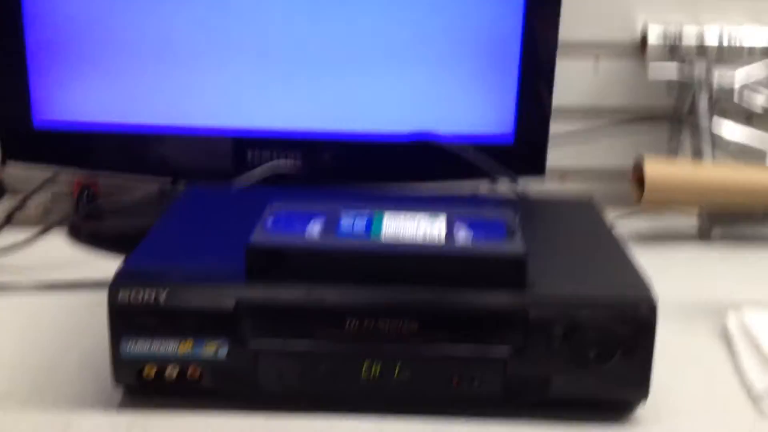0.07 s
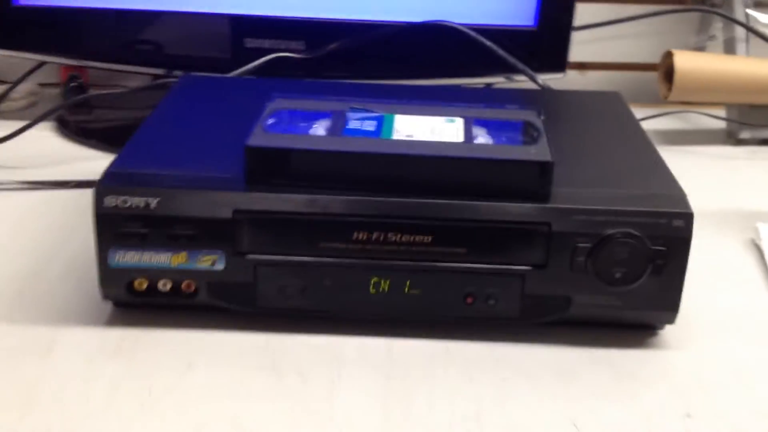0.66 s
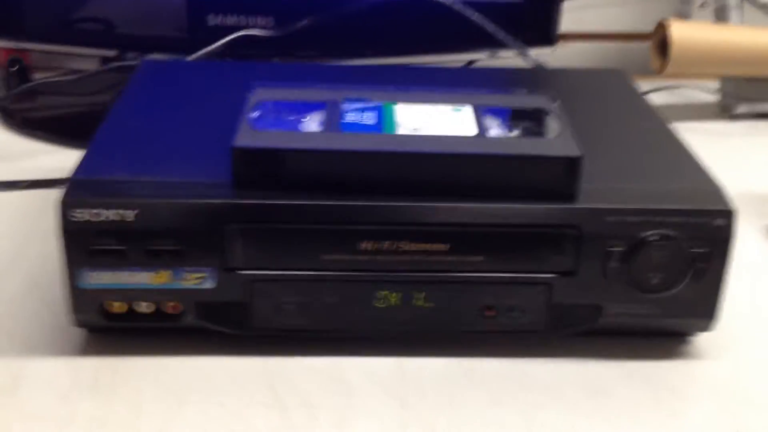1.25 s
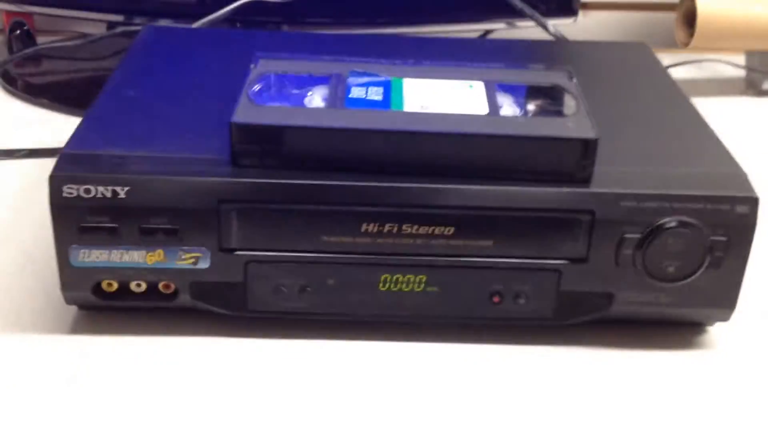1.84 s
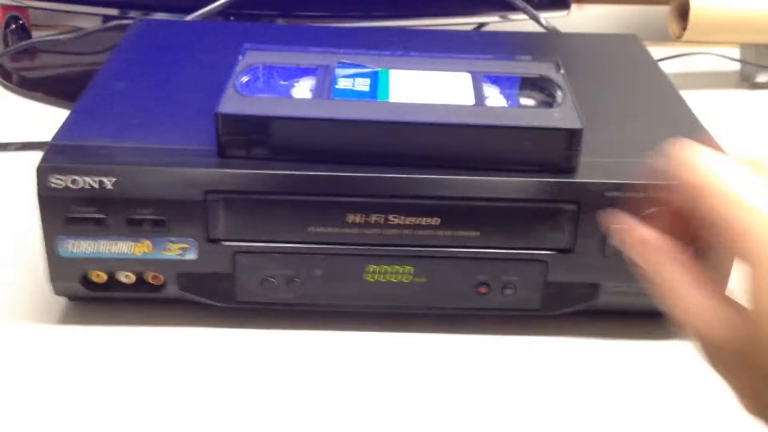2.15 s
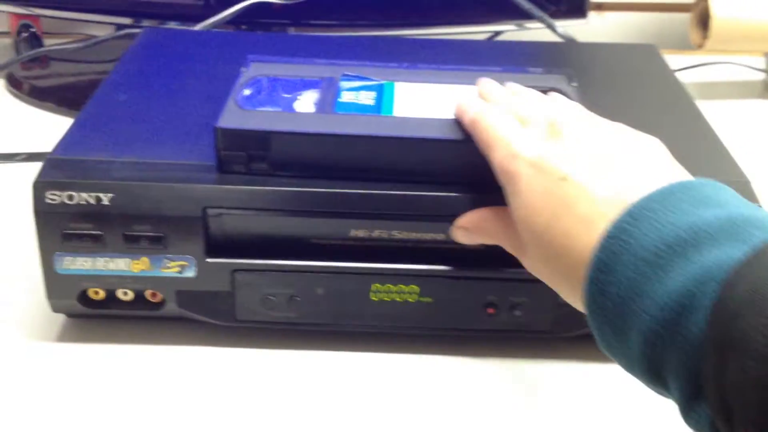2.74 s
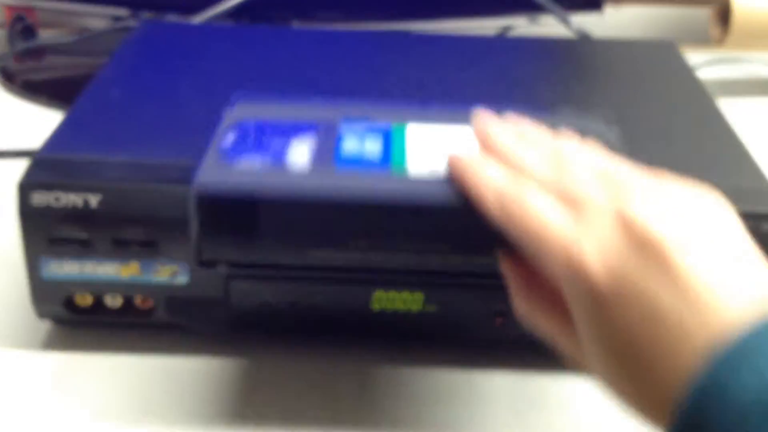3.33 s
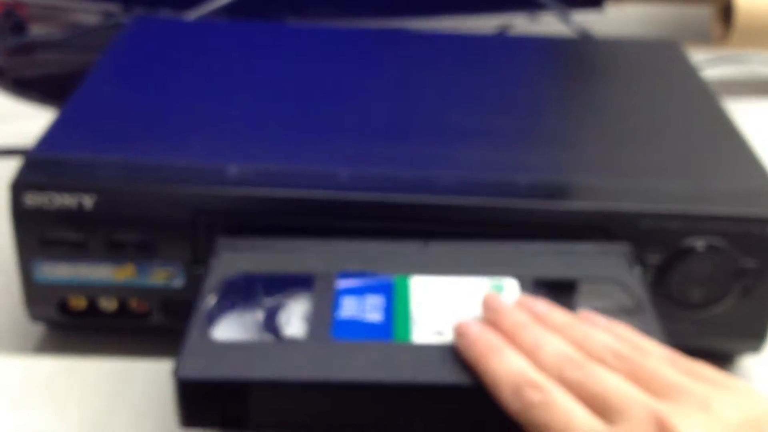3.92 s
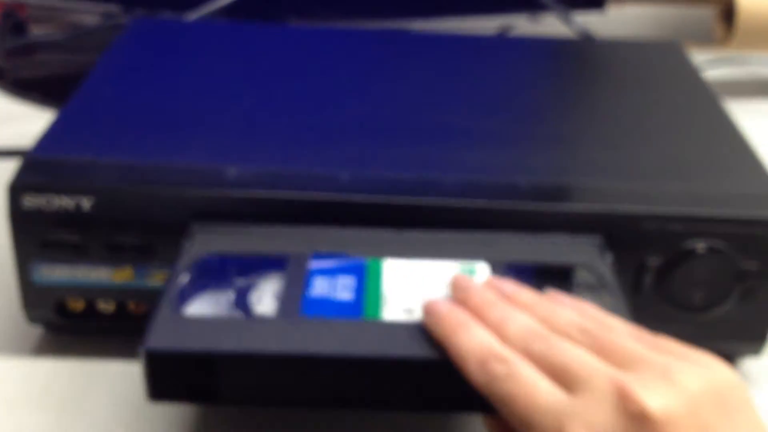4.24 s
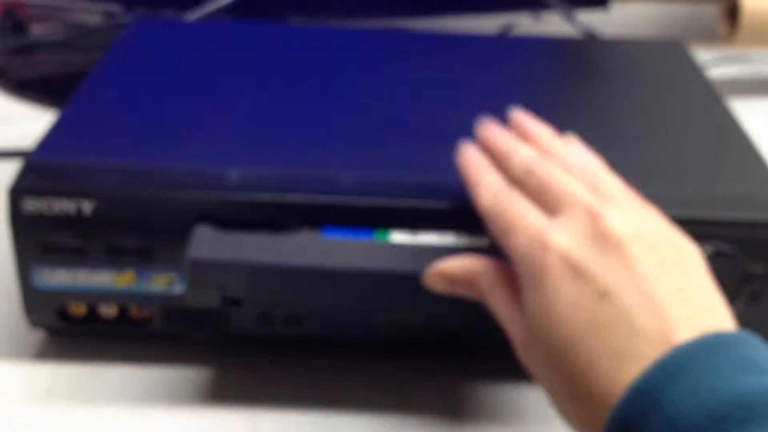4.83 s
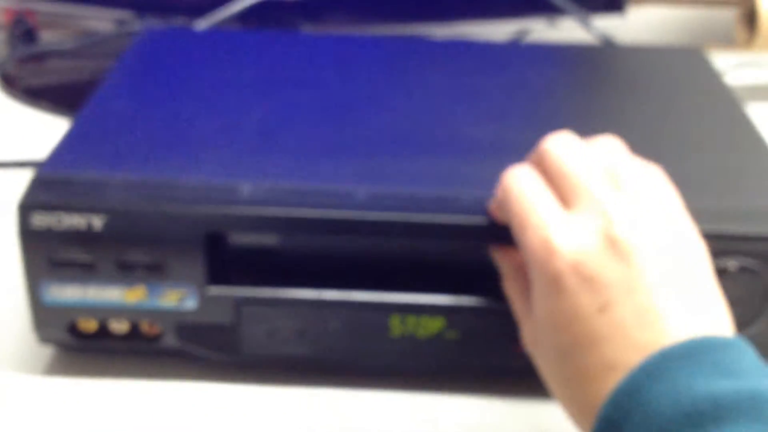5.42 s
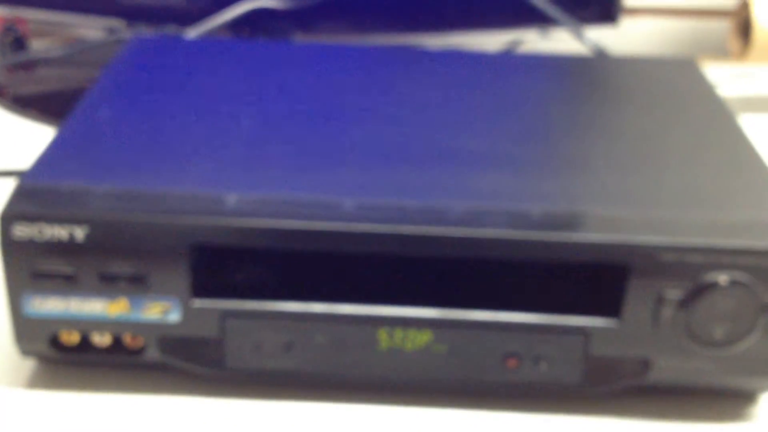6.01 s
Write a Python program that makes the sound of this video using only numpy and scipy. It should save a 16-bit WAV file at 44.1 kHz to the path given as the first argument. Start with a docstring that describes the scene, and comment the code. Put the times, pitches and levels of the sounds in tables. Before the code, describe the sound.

In a quiet room, plastic slides and knocks as a videotape is pushed into a recorder, whose motor whirs and clatters.

```python
"""A video cassette is gripped, dragged off the lid of a tape deck and pushed through the flap into its slot.
Plastic scrapes in stick-slip bursts; the loader draws the cassette in and lowers it with clicks and
clacks, then the motor whirs, gear teeth tick and the mechanism rasps. Every contact booms in the
sheet-metal case. Before it all, clothes rustle and one dull tap sounds in the small, quiet room."""
import sys
import numpy as np
from scipy import signal
from scipy.fft import rfft, irfft, next_fast_len
from scipy.io import wavfile
from scipy.ndimage import map_coordinates

SR = 44100
rng = np.random.default_rng(int(sys.argv[2]) if len(sys.argv) > 2 else 0)


def file_out(sig):
    """Save sig as 16-bit WAV at sys.argv[1]."""
    # one column per channel
    cols = np.atleast_2d(sig).T
    # limit, then scale
    lim = np.clip(cols, -1, 1)
    pcm = np.round(lim * 32767).astype(np.int16)
    wavfile.write(sys.argv[1], SR, pcm)


N = 267246


def amp(db):
    """Decibels to gain."""
    return 10 ** (np.asarray(db) / 20)


def unit(x):
    """Scale to rms 1."""
    return x / np.sqrt(np.mean(x ** 2) + 1e-20)


def burst(x):
    """Scale a hit to the energy of 10 ms at rms 1."""
    return x / np.sqrt(np.sum(x ** 2) / (SR / 100) + 1e-20)


def along(points, hz):
    """Read a (frequency, value) curve on a log frequency axis."""
    freqs, values = np.transpose(points)
    return np.interp(np.log(hz + 1), np.log(freqs + 1), values)


def wobble(rate, size=N):
    """Smooth random modulation, rate knots a second."""
    knots = rng.standard_normal(int(size * rate / SR) + 4)
    return map_coordinates(knots, [np.arange(size) * rate / SR])


def swell(middle, length):
    """A bell-shaped fade in and out, timed in seconds."""
    return np.cos(np.pi * np.clip((np.arange(N) / SR - middle) / length, -.5, .5)) ** 2


def filtered(x, response):
    """Apply a frequency response."""
    size = next_fast_len(len(x) + 4096)
    return irfft(rfft(x, size) * response(np.fft.rfftfreq(size, 1 / SR)), size)[:len(x)]


def coloured(x, curve):
    """Shape x with a (frequency, gain) EQ curve."""
    return filtered(x, lambda hz: amp(along(curve, hz)))


def resonate(x, modes):
    """Ring x through parallel (frequency, width, gain) resonators of alternating polarity."""
    return filtered(x, lambda f: sum((-1) ** k * amp(db) * 1j * f * w / (hz * hz - f * f + 1j * f * w)
                                     for k, (hz, w, db) in enumerate(modes)))


def add(track, s, sound):
    """Mix a sound into the track from time s."""
    start = round(s * SR)
    track[start:start + len(sound)] += sound[:N - start]


# room tone EQ: f/Hz, gain/dB
ROOM_TONE_EQ = [(15, -71), (25, -45), (44, -13), (90, -30), (112, -12.5), (146, -11), (213, -5), (286, -9),
                (475, -11), (558, -14), (604, -13), (1000, -17.5), (1630, -16), (3930, -26), (15000, -33.5)]
# two faint narrow bands of hiss in the room tone: f/Hz, width/Hz, gain/dB
HISS_BANDS = [(1650, 130, 0.5), (2540, 140, -0.5)]


def room_tone():
    """A bed of room noise with two faint narrow bands of hiss, wavering slightly."""
    waver = amp(.4 * wobble(4))
    hiss = amp(-78.5) * unit(resonate(rng.standard_normal(N), HISS_BANDS))
    air = amp(-65) * unit(coloured(rng.standard_normal(N), ROOM_TONE_EQ))
    return waver * (air + hiss)


# cloth moves: middle t/s, length/s, body/dB, hiss/dB
RUSTLES = [(0.454, 1, -80, -74), (0.738, 0.14, -68, -61), (0.915, 0.45, -62.5, -68),
           (1.25, 0.22, -71, -72.5), (2.363, 0.31, -73.5, -94)]
# EQ of the cloth's body and of its hiss: f/Hz, gain/dB
CLOTH_BODY_EQ = [(300, -7.5), (1000, -0.5), (2400, 1), (4000, -8), (15000, -39)]
CLOTH_HISS_EQ = [(2500, -9), (6000, -1.5), (9500, 3.5), (15000, -4.5)]


def clothes():
    """Cloth rustles in soft, uneven swells as an arm reaches out."""
    body_gain, hiss_gain = sum(np.outer(amp([body_db, hiss_db]), swell(s, length))
                               for s, length, body_db, hiss_db in RUSTLES)
    folds = amp(1.8 * wobble(35))
    body = unit(coloured(rng.standard_normal(N), CLOTH_BODY_EQ))
    hiss = unit(coloured(rng.standard_normal(N), CLOTH_HISS_EQ))
    return folds * (body_gain * body + hiss_gain * hiss)


def thud(t, hz, attack):
    """A low sine that swells for attack seconds and dies away."""
    age = t / attack
    return age ** 2 * np.exp(2 * (1 - age)) * np.sin(2 * np.pi * hz * t)


# one close, dull tap: t/s, level/dB, f/Hz, attack/s
TAP = (1.3505, -30, 175, .0034)


def tap():
    """A tiny tick leads into two cycles of dull thud."""
    s, db, hz, attack = TAP
    out, t = np.zeros(N), np.arange(SR // 10) / SR
    tick_modes = [(500, 250, 6.0), (2750, 610, -2.5), (6500, 14000, -11.5), (12100, 9400, -25)]
    add(out, s - .001, amp(-49) * burst(resonate(1. * (t == 0), tick_modes)))
    add(out, s, amp(db) * thud(t, hz, attack))
    return out


def chatter(t, t60, rise):
    """The force of a contact: micro-impacts that die away fast."""
    return rng.standard_normal(len(t)) * amp(-60 * t / t60) * (1 - np.exp(-t / rise))


def strike(t, t60):
    """A short contact is mostly one clean blow; a long one is mostly chatter."""
    clean = np.clip(1 - t60 / 0.093, 0, 1)
    blow = burst(1. * (t == t[SR // 2000]))
    return np.sqrt(clean) * blow + np.sqrt(1 - clean) * burst(chatter(t, t60, rise=0.00011))


def varied(modes, spread_db):
    """Each contact point favours other modes, and the changing grip detunes them a little."""
    return [(hz * (1 + .012 * rng.standard_normal()), width, db + spread_db * rng.standard_normal())
            for hz, width, db in modes]


# resonators of the deck and cassette: f/Hz, width/Hz, gain/dB
CASE_MODES = [(251, 32, -7.5), (304.3, 38, 1), (343.2, 42, -3), (427, 73, -11.5)]  # sheet-metal lid
HOLLOW_MODES = [(520, 100, -10.5), (655, 21, -5), (791, 68, 2), (874, 61, -2), (937, 63, -3.5),
                (1170, 51, -8), (1292, 50, -13.5)]  # hollow of the cassette shell
WALL_MODES = [(1527, 98, -1.5), (1718, 92, -2.5), (1890, 84, -2.5), (2080, 200, -4.5), (2450, 270, -6),
              (2696, 150, -7.5), (2977, 104, -8), (3200, 67, -4), (3430, 490, -11.5), (3950, 106, -12),
              (4256, 74, -12.5)]  # stiff plastic walls
RIB_MODES = [(5000, 210, 10), (5350, 46, 5), (5670, 250, 5), (6500, 260, 4), (7100, 510, 6.5),
             (8430, 240, 6), (8900, 530, 6.5), (9600, 670, 0)]  # small levers, guides and ribs
# EQ of an edge click: f/Hz, gain/dB
EDGE_EQ = [(3000, -1), (4400, 1.5), (5600, -2), (8000, 0.5), (10500, -6.5), (13000, -6.5), (16000, -11)]
# hits of cassette, flap and loader: t/s, wall level/dB, hardness/dB, edge f/Hz, base t60/s, boom/dB
CONTACTS = [(2.645, -54, 4, 7700, 0.036, -53), (2.857, -63, 13, 9800, .035, -55),
            (2.8932, -42, -3, 6500, 0.066, -51), (2.8978, -36, 2, 10000, 0.042, -59),
            (2.927, -48, 6, 10200, .02, -36), (3.0477, -43.5, 5, 9900, 0.024, -50),
            (3.561, -36, -4, 6470, 0.037, -57), (3.564, -39, -8, 4400, 0.022, -49),
            (3.57, -38, 2, 9000, 0.014, -42), (3.8497, -47.5, -5, 3500, 0.043, -44),
            (3.8596, -51.5, -1, 9100, 0.022, -61), (3.877, -49.5, -2, 9100, 0.04, -53),
            (3.954, -43, -7.5, 5950, 0.026, -45.5), (4.062, -44.5, -1.5, 6340, 0.011, -51),
            (4.068, -42, -1, 6000, 0.014, -48), (4.086, -43, 2.5, 8900, 0.012, -54),
            (4.0995, -41.5, -18, 6500, 0.024, -43), (4.1526, -47.5, 5, 13600, 0.028, -45),
            (4.167, -49.5, 8, 13400, .018, -57), (4.175, -41.5, -1.5, 13100, 0.048, -42.5),
            (4.217, -37, 4, 4540, 0.022, -41.5), (4.243, -38, 7, 11000, 0.02, -46),
            (4.254, -31, -1.5, 4500, 0.035, -45), (4.268, -34, -2, 8000, 0.018, -43),
            (4.315, -53, 6, 3400, .025, -57), (4.337, -48.5, 7, 3300, 0.034, -50),
            (4.359, -50, 6, 9000, .04, -55), (4.3726, -32, 3, 9200, 0.028, -38.5),
            (4.395, -38.5, 2, 13700, 0.024, -41), (4.444, -39.5, 1, 4450, 0.066, -38.5),
            (4.472, -40.5, 3, 4600, 0.014, -38), (4.516, -44, -1, 8850, 0.033, -51),
            (4.5347, -45, 11.5, 7100, 0.015, -38), (4.59, -40.5, 6, 10900, 0.016, -46),
            (4.649, -50, 2, 5000, 0.018, -49), (4.669, -42, 0.5, 7600, .025, -44),
            (4.69, -47, 2, 5000, 0.021, -49), (4.8114, -43, -2.5, 4500, 0.074, -54),
            (4.891, -45.5, 9, 8900, 0.03, -50), (4.934, -43, -6, 7640, 0.035, -50),
            (5.05, -49, -1, 6700, 0.015, -63), (5.076, -45.5, 0.5, 6070, 0.02, -56),
            (5.115, -55, 8, 10500, .02, -60), (5.13, -42, 4, 3900, 0.029, -48),
            (5.171, -44.5, 8, 9900, 0.03, -47), (5.332, -58, -6, 3770, .03, -51),
            (5.346, -41, -4, 3400, 0.041, -43.5), (5.578, -44.5, -16, 3500, 0.043, -41),
            (5.595, -48, -7, 3500, 0.044, -60), (5.671, -60, -20, 4000, 0.022, -58),
            (5.773, -64, -25, 6000, 0.033, -50), (5.867, -58, 4, 7000, .025, -62),
            (5.8785, -39, -1.5, 3400, 0.024, -56), (5.91, -42, 2.5, 4470, 0.011, -43),
            (5.939, -51, 5, 12500, .03, -50), (5.959, -38.5, 3, 3600, 0.033, -59),
            (5.981, -35, 3, 3400, 0.04, -44)]


def contacts():
    """Plastic hits boom in the case; hard ones click at the edge, soft ones sound the hollow shell."""
    out, t = np.zeros(N), np.arange(SR // 5) / SR
    for s, wall_db, hardness, edge_hz, t60, boom_db in CONTACTS:
        click_db = wall_db - 4.5 + hardness
        hollow_db = wall_db - 7 - 0.41 * hardness
        # a harder hit reaches the higher wall modes and opens the shell's filter
        tilt_db_per_octave = np.clip(hardness + .5, -10, 10)
        top_hz = np.clip(11000 * 2 ** (hardness / 10), 2500, 18000)
        tilted = [(hz, width, db + tilt_db_per_octave * np.log2(hz / WALL_MODES[0][0]))
                  for hz, width, db in WALL_MODES]
        walls = burst(resonate(strike(t, 2.22 * t60), varied(tilted, spread_db=2)))
        hollow = burst(resonate(strike(t, 2.3 * t60), varied(HOLLOW_MODES, spread_db=4.5)))
        shell_band = signal.butter(2, [300, top_hz], "bandpass", fs=SR, output="sos")
        shell = signal.sosfilt(shell_band, amp(wall_db) * walls + amp(hollow_db) * hollow)
        boom = burst(resonate(strike(t, t60), CASE_MODES))
        snap = chatter(t, 1.55 * t60, rise=0.0015)
        ribs = burst(resonate(snap, varied(RIB_MODES, spread_db=3)))
        ring = burst(resonate(snap, [(edge_hz, 1400, 0)]))
        click = burst(burst(coloured(snap, EDGE_EQ)) + 0.61 * ribs + 1.37 * ring)
        add(out, s, shell + amp(boom_db) * boom + amp(click_db) * click)
    return out


def held(start, length, attack_s=0.011, release_t60_s=0.15):
    """The envelope of a rub: quick attack, hold, dying release."""
    t = np.arange(N) / SR - start
    return np.clip(t / attack_s, 0, 1) * amp(-60 * np.maximum(t - length, 0) / release_t60_s)


def stick_slip(per_s, share, decay_s):
    """The grain of a rub: surfaces catch and let go in bursts that carry a share of its power."""
    t = np.arange(SR // 25) / SR
    slips = (rng.random(N) < per_s / SR) * rng.exponential(size=N)
    power = np.abs(signal.fftconvolve(slips, np.exp(-t / decay_s))[:N])
    return np.sqrt(1 - share + share * power / power.mean())


# low end of the loaded chassis: f/Hz, width/Hz, gain/dB
CHASSIS_MODES = [(174, 38.6, -1.5), (222, 53, -2.5)]
# EQ of surface hiss: f/Hz, gain/dB
HISS_EQ = [(2800, -4), (4200, 8.5), (5500, 1), (7300, 6), (9500, 0), (12000, -1), (16000, -9.5)]


def friction(gains, eq, grip, chassis_db, ring_db):
    """A rub of uneven grip drives three layers: case boom, plastic scrape and surface hiss."""
    def force():
        return grip * rng.standard_normal(N)

    def blend(main, under, db):
        return unit(unit(main) + amp(db) * unit(under))

    boom_gain, scrape_gain, hiss_gain = gains
    boom = blend(resonate(force(), CASE_MODES), resonate(force(), CHASSIS_MODES), chassis_db)
    scrape = blend(coloured(force(), eq), resonate(force(), HOLLOW_MODES + WALL_MODES[:7]), ring_db)
    hiss = blend(coloured(force(), HISS_EQ), resonate(force(), RIB_MODES), ring_db - 2)
    return boom_gain * boom + scrape_gain * scrape + hiss_gain * hiss


def loose_ticks(per_s):
    """Loose levers and ribs tick at random."""
    knocks = (rng.random(N) < per_s / SR) * rng.uniform(.5, 1, N)
    return unit(unit(resonate(knocks, RIB_MODES)) + .5 * unit(resonate(knocks, WALL_MODES)))


# EQ of the scrape in the slot: f/Hz, gain/dB
SLOT_EQ = [(300, -41), (450, -13), (600, -10.5), (830, 0), (980, 2.5), (1150, -9.5), (1350, -4),
           (1550, -0.5), (2200, -5), (3000, -8), (4200, -16), (5500, -43)]
# the grip, the push along the slot, the carriage's travel and its closing rasp:
# t/s, length/s, scrape/dB, boom over scrape/dB, hiss over scrape/dB
STROKES = [(2.71, 0.077, -66.5, 6.5, -11.5), (3.845, 0.31, -65, 4.5, -3), (4.236, 0.035, -40.5, 4, -5.5),
           (4.298, 0.068, -56, 8.5, -2), (4.351, 0.073, -46, -3.5, -11), (4.444, .105, -42, 1, -8.5),
           (4.574, 0.06, -44.5, -2, -8), (4.645, 0.07, -44, 0, -7), (4.851, 0.093, -48, 0, -10),
           (4.964, 0.098, -56.5, 1, -6), (5.061, 0.14, -49, -4, -9), (5.325, 0.039, -49.5, -9.5, -8.5),
           (5.858, 0.014, -48, -22, -8), (5.88, 0.048, -45.5, 4.5, -6.5), (5.926, 0.03, -42, 2, -5),
           (5.956, .032, -39, -1, -3.5)]


def strokes():
    """Cassette and carriage rub along their guides, plastic on plastic; ticks ride under the hiss."""
    gains = sum(np.outer(amp([db + boom_db, db, db + hiss_db]), held(s, length))
                for s, length, db, boom_db, hiss_db in STROKES)
    ticks = gains[2] * amp(-9) * loose_ticks(per_s=32)
    grip = stick_slip(per_s=150, share=0.52, decay_s=0.004)
    return ticks + friction(gains, SLOT_EQ, grip, chassis_db=-8.5, ring_db=-2.5)


# soft bumps on the case: t/s, level/dB, f/Hz, attack/s
BUMPS = [(2.724, -43.5, 284.4, .013), (2.903, -32.5, 348, 0.0051), (2.933, -33, 270, 0.0069),
         (3.055, -36, 295, .008), (3.135, -38, 320, .008), (3.322, -38, 345, .005),
         (3.375, -31.5, 322, 0.0107), (3.448, -38, 305, .007), (4.269, -33, 312, 0.01),
         (4.458, -34, 300, .014), (4.548, -33, 290, .005), (4.713, -27.5, 289, 0.0063),
         (4.895, -42, 235, .008), (4.922, -37, 293, 0.0083), (5.196, -36.5, 312, 0.0047),
         (5.350, -33, 332.5, .016), (5.583, -40, 205, .007), (5.609, -39.5, 274, 0.0094),
         (5.938, -39, 180, .009), (6.028, -39, 300, .005)]


def bumps():
    """Soft pressure swells a low mode of the case without any click."""
    out, t = np.zeros(N), np.arange(SR // 5) / SR
    for s, db, hz, attack in BUMPS:
        add(out, s, amp(db) * thud(t, hz, attack))
    return out


# EQ of the scrape on the lid: f/Hz, gain/dB
DRAG_EQ = [(300, -36), (450, -3.5), (600, -8.5), (850, 2), (1000, -1), (1150, -6), (1400, -7.5), (1550, 2),
           (2000, -5), (2500, -8.5), (3000, -13), (4200, -18), (5500, -29)]
# how hard the hand drags: t/s, effort/dB
DRAG_EFFORT = [(2.96, -42), (2.966, -45), (3.226, -43.5), (3.27, -40.5), (3.446, -39), (3.498, -47.5),
               (3.53, -44), (3.545, -51)]


def drag(start_s=2.897, length_s=0.675, middling_db=-41.5):
    """The cassette slides off the lid: more effort scrapes louder and brighter."""
    t = np.arange(N) / SR
    effort_db = np.interp(t, *np.transpose(DRAG_EFFORT)) - middling_db
    boom_db = -47 - 13.5 * np.clip(t - start_s, 0, length_s)  # fades as the weight leaves the lid
    scrape_db = -41.5 + 0.99 * effort_db
    hiss_db = -52.5 + 2.5 * effort_db
    gains = held(start_s, length_s) * amp([boom_db, scrape_db, hiss_db])
    grip = stick_slip(per_s=260, share=0.65, decay_s=0.0028)
    return friction(gains, DRAG_EQ, grip, chassis_db=-18.5, ring_db=-6)


# single parts that ring out: t/s, f/Hz, level/dB, t60/s
PART_RINGS = [(2.898, 1000, -38, .09), (2.908, 450, -37, .08), (3.564, 785, -31, .05),
              (4.218, 2400, -31, .03), (4.251, 4250, -32, .06), (4.266, 780, -28, .05),
              (4.336, 3250, -39, .045), (4.373, 3050, -30, .03), (4.375, 1850, -29, .035),
              (4.936, 975, -33, .06), (5.05, 1800, -32, .022), (5.131, 3400, -35, .03),
              (5.168, 10100, -35, .035), (5.346, 880, -39, .07), (5.773, 850, -47, .06),
              (5.957, 7800, -33, .015), (5.958, 960, -39, .08), (5.982, 2900, -29, .045)]


def part_rings(attack_s=.0015):
    """A knocked part sings briefly at its own pitch, roughened by its rattling seat."""
    out, t = np.zeros(N), np.arange(SR // 6) / SR
    for s, hz, db, t60 in PART_RINGS:
        rattle = .5 * wobble(hz / 8, size=len(t))
        envelope = (1 - np.exp(-t / attack_s)) * amp(-60 * t / t60)
        add(out, s, amp(db) * envelope * np.sin(2 * np.pi * hz * t + rattle))
    return out


# sweep of the air gap's main resonance: t/s, f/Hz, level/dB
GAP_SWEEP = [(3.18, 2263, -77), (3.27, 2080, -47), (3.328, 2023, -42.5), (3.40, 1796, -41.5),
             (3.445, 1532, -38.5), (3.48, 1450, -60)]


def air_gap():
    """The scrape rings in the gap under the cassette: three bands fall unevenly as the gap lengthens."""
    def band(angle, width_hz):
        return unit(wobble(width_hz) * np.cos(angle) + wobble(width_hz) * np.sin(angle))

    s, hz, db = np.transpose(GAP_SWEEP)
    t = np.arange(N) / SR
    rocking = 1 + .045 * wobble(60)
    phase = 2 * np.pi * np.cumsum(np.interp(t, s, hz) * rocking) / SR
    voice = band(phase, 560) + amp(-4) * band(1.6 * phase, 1100) + amp(-11) * band(.45 * phase, 120)
    return amp(np.interp(t, s, db, left=-120, right=-120)) * voice


def slam(hit, ring_modes, crack_modes):
    """A heavy blow: the parts crunch together for a few milliseconds, ring and shake the case."""
    s, ring_db, crack_db, t60, boom_db = hit
    out, t = np.zeros(N), np.arange(SR // 8) / SR
    ring = burst(resonate(1. * (t == t[SR // 800]), ring_modes))
    snap = chatter(t, t60, rise=.003) * np.clip(t / .0015, 0, 1)
    crack = burst(burst(resonate(snap, crack_modes)) + .8 * burst(coloured(snap, EDGE_EQ)))
    boom = burst(resonate(strike(t, t60), CASE_MODES))
    add(out, s, amp(ring_db) * ring + amp(crack_db) * crack + amp(boom_db) * boom)
    return out


# resonators of the slot: f/Hz, width/Hz, gain/dB
PANEL_MODES = [(794, 55, 3), (935, 70, -5), (1168, 60, -0.5), (1700, 75, 1), (2080, 100, 0)]  # front panel
LIP_MODES = [(2560, 200, -1), (3630, 260, -2), (4200, 400, -5), (4800, 450, 0), (6100, 350, -6),
             (6630, 320, 2), (8070, 400, -8)]  # stiff lip
CARRIAGE_MODES = [(800, 70, 1), (1510, 80, -1), (1760, 120, -1), (1950, 90, -2), (2540, 70, -2),
                  (2980, 90, 3), (4200, 180, 0), (4810, 70, -1), (5230, 90, 0), (5660, 110, 2),
                  (6840, 120, -3), (7390, 120, -2), (8150, 140, -1)]  # carriage with the cassette in it
# the two heavy hits: t/s, ring/dB, crack/dB, contact t60/s, boom/dB
LIP_HIT = (3.8116, -30, -29.8, .015, -47)
SEAT_HIT = (4.2332, -30, -25.3, .05, -46)


def clacks():
    """The cassette lands on the lip of the slot, then hits home in the carriage."""
    return slam(LIP_HIT, PANEL_MODES, LIP_MODES) + slam(SEAT_HIT, CARRIAGE_MODES, CARRIAGE_MODES)


# resonators of the gear train: f/Hz, width/Hz, gain/dB
GEAR_MODES = [(480, 50, -2), (910, 60, 3), (1560, 90, -2), (2050, 300, -6), (3400, 600, -12),
              (6800, 300, -15), (7600, 300, -16), (10900, 500, -17)]
# load on the motor once the cassette trips its switch: t/s, level/dB
MOTOR_LOAD = [(4.82, -1), (5.2, 0), (5.29, -3), (5.45, 2.5), (5.54, -2), (5.72, -3), (5.85, -2), (6.05, -1)]


def motor(tooth_hz=101, jitter=.06):
    """The loading motor whirs through the case and its gear teeth tick, both louder under load."""
    t = np.arange(N) / SR
    load = amp(np.interp(t, *np.transpose(MOTOR_LOAD), left=-120))
    gains = np.outer(amp([-55, -68, -77]), load)  # boom, scrape, hiss
    grip = stick_slip(per_s=98, share=0.52, decay_s=0.0027)
    whir = friction(gains, SLOT_EQ, grip, chassis_db=-16, ring_db=-5)
    teeth = np.cumsum(tooth_hz * (1 + jitter * wobble(40))) / SR
    meshing = np.exp(-5 * (teeth % 1)) * rng.standard_normal(N)  # one noise burst per tooth
    return whir + load * amp(-63) * unit(resonate(meshing, GEAR_MODES))


# one faint squeak: middle t/s, length/s, f/Hz, level/dB
SQUEAK = (5.515, .07, 5300, -68)


def squeak():
    """A guide sticks and sings for a moment, slightly unsteady."""
    s, length, hz, db = SQUEAK
    phase = 2 * np.pi * np.cumsum(hz * (1 + .02 * wobble(500))) / SR
    return amp(db) * swell(s, length) * np.sin(phase)


# decay of the small room: f/Hz, t60/s
ROOM_DECAY = [(200, 0.41), (2000, 0.18), (12000, 0.11)]


def reverb(x):
    """A short diffuse tail, with 5 ms of pre-delay for the first wall."""
    hz, t, spectrum = signal.stft(rng.standard_normal(SR // 2), SR, nperseg=256)
    decay = amp(-60 * t / along(ROOM_DECAY, hz)[:, None])
    tail = signal.istft(spectrum * decay, SR, nperseg=256)[1]
    tail = np.pad(tail / np.linalg.norm(tail), (SR // 200, 0))
    return signal.fftconvolve(x, tail)[:N]


def scene():
    """Mono mix: cassette and deck feed the reverb; tap, clothes and room tone stay dry."""
    deck = contacts() + clacks() + part_rings() + bumps()
    deck += drag() + air_gap() + strokes() + motor() + squeak()
    return (deck + amp(-13.5) * reverb(deck) + tap() + clothes() + room_tone())[None]


def record(dry):
    """The microphone rolls off the deep bass and keeps nothing above its band limit."""
    low_cut_hz, top_hz = 88, 15700
    thin = signal.sosfilt(signal.butter(2, low_cut_hz, "highpass", fs=SR, output="sos"), dry[0])
    return filtered(thin, lambda hz: hz < top_hz)[None]


dry = scene()
out = record(dry)
file_out(out)
```